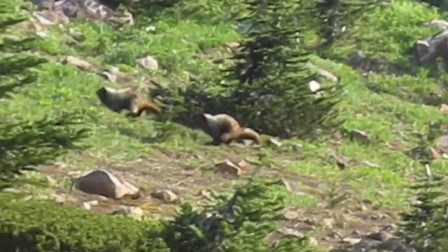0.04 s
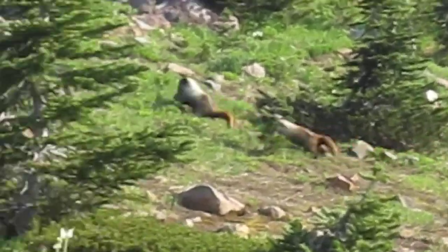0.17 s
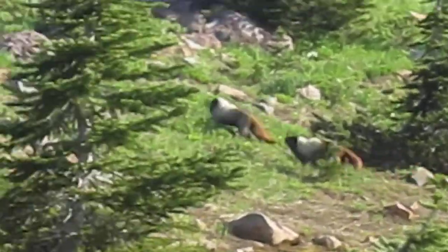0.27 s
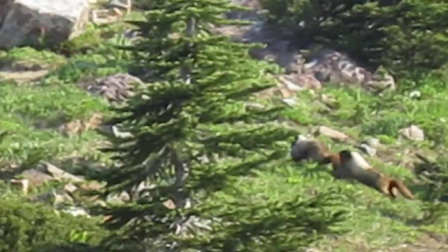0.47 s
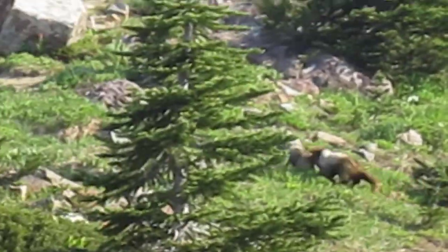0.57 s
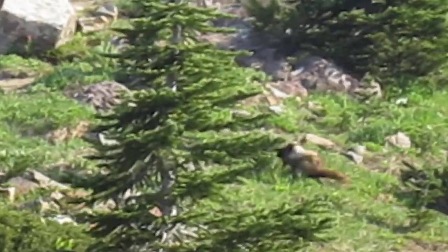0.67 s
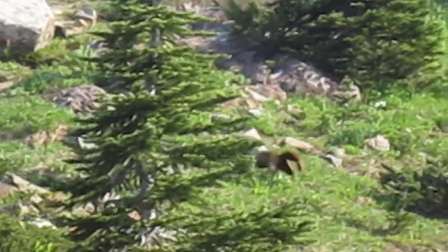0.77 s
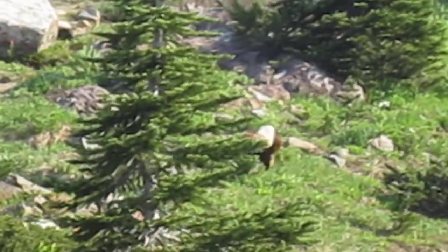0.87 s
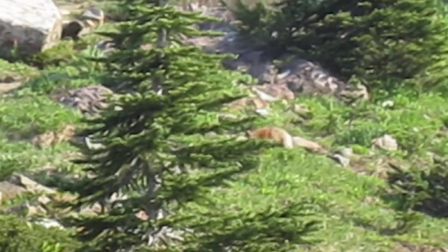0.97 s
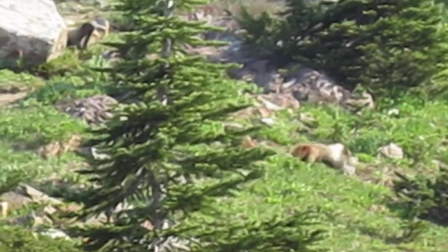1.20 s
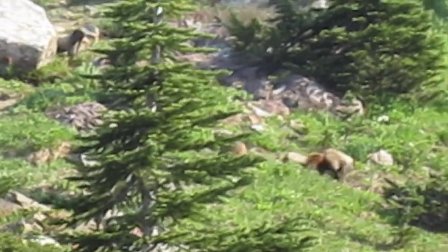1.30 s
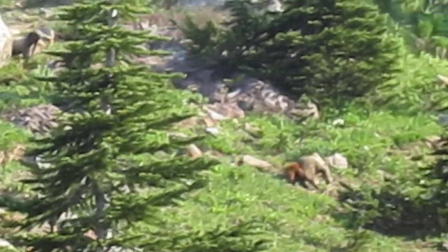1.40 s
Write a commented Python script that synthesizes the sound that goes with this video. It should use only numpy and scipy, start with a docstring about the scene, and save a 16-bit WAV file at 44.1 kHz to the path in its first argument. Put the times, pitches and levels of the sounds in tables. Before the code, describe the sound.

Thin, faint bird whistles in a steady breeze, just after a sharp handling click.

```python
"""An open mountain meadow: light wind, a steady hiss and a faint wavering hum go on throughout.
At 0.2 s a camera is handled close by: its plastic body gives a dull knock, then a sharp click
that makes its gain control turn the sound down a little. A faint tick follows.
From just after the click to the end, a small bird sings thin, arching whistles,
often with two voices at once."""
import sys
import numpy as np
from scipy import signal
from scipy.fft import rfft, irfft, next_fast_len
from scipy.io import wavfile
from scipy.ndimage import uniform_filter1d, map_coordinates

SR = 44100
rng = np.random.default_rng(int(sys.argv[2]) if len(sys.argv) > 2 else 0)


def wav_out(sig):
    """Save sig, one row per channel (or a flat mono array), as 16-bit PCM at SR to the path in sys.argv[1]."""
    wavfile.write(sys.argv[1], SR, np.round(np.clip(np.atleast_2d(sig).T, -1, 1) * 32767).astype(np.int16))


N = 63945  # 1.45 s


def amp(db):
    """Turn decibels into a number to multiply a sound by."""
    return 10 ** (np.asarray(db) / 20)


def unit(x):
    """Scale a sound to an average (rms) size of 1."""
    return x / np.sqrt(np.mean(x ** 2) + 1e-20)


def curves(rows):
    """Join (time, values...) rows with straight lines, giving one curve for each value column."""
    times, *columns = np.transpose(rows)
    return [np.interp(np.arange(N) / SR, times, column) for column in columns]


def wobble(rate):
    """A smooth curve through `rate` random values a second."""
    return map_coordinates(rng.standard_normal(N // 8), [np.arange(N) * rate / SR], mode="mirror")


def filtered(x, response):
    """Multiply each frequency in a sound by response(hz)."""
    size = next_fast_len(N + SR // 2)
    return irfft(rfft(x, size) * response(np.fft.rfftfreq(size, 1 / SR)), size)[:N]


def noise(spectrum):
    """Noise of average size 1, its tone shaped by (frequency [Hz], level [dB]) rows."""
    points_hz, db = np.transpose(spectrum)
    response = lambda hz: amp(np.interp(np.log(hz + 1), np.log(points_hz), db))
    return unit(filtered(rng.standard_normal(N), response))


def lowpass(x, hz, order):
    """Dull a sound by weakening what lies above hz."""
    return signal.lfilter(*signal.butter(order, min(hz, SR / 2 - 1), fs=SR), x)


def wind():
    """The same gusts rumble at the microphone and rush over the grass."""
    # wind strength (time [s], relative level [dB])
    gusts = [(0, 2), (.08, 0.5), (.17, 1), (.33, 0), (.45, 0), (.6, 0), (.8, 0.5), (.91, 4.5), (1.0, 0),
             (1.1, 1), (1.22, -0.5), (1.39, 1), (1.45, -1.5)]
    # tone of the rumble and of the rush (frequency [Hz], relative level [dB])
    rumble_spectrum = [(10, -1), (25, 1.5), (58, 6.5), (85, -1.5), (130, -13), (300, -48)]
    rush_spectrum = [(60, -4.5), (130, 0.5), (280, -1), (450, -3), (650, -4), (900, -6), (1400, -11),
                     (2500, -22), (6000, -37)]
    gust_db, = curves(gusts)
    level_db = -55.5 + gust_db
    rumble = amp(level_db) * noise(rumble_spectrum)
    rush = amp(level_db + .4 * wobble(14.7)) * noise(rush_spectrum)
    return rumble + rush


def hiss():
    """A soft, even hiss whose level barely moves."""
    # loudness of the hiss (time [s], level [dB])
    levels = [(0, -61.5), (.17, -60), (.45, -60.5), (.69, -61), (.755, -59), (.82, -59), (.96, -59.5),
              (1.1, -60.5), (1.24, -60.5), (1.45, -60.5)]
    # tone of the hiss (frequency [Hz], relative level [dB])
    spectrum = [(200, -7), (1500, 1.5), (2500, -.5), (4500, -3), (7000, -6.5), (10000, -10), (13500, -15),
                (15600, -20.5)]
    level_db, = curves(levels)
    return amp(level_db) * noise(spectrum)


def hum():
    """A faint distant tone that wavers in pitch and level."""
    # loudness of the hum (time [s], level [dB])
    levels = [(0, -69.5), (.47, -66), (.55, -62), (.7, -64.5), (.81, -71.5), (.9, -64.5), (1.07, -64),
              (1.25, -69.5), (1.45, -69)]
    level_db, = curves(levels)
    pitch_hz = 561.7 * (1 + .0233 * wobble(70.1))
    phase = 2 * np.pi * np.cumsum(pitch_hz) / SR
    return amp(level_db + 1.7 * wobble(36.7)) * np.sqrt(2) * np.sin(phase)


def whistle(phrase, fade_s=.0054, flutter_share=.004, flutter_db=2.4):
    """One pure, gliding tone that flutters slightly in pitch and level."""
    hz, db = curves(phrase)
    t = np.arange(N) / SR
    start_s, end_s = phrase[0][0], phrase[-1][0]
    fade = np.clip(np.minimum(t - start_s, end_s - t) / fade_s + 1, 0, 1)
    pitch_hz = hz * (1 + flutter_share * wobble(350))
    phase = 2 * np.pi * np.cumsum(pitch_hz) / SR
    return np.sqrt(2) * fade * amp(db + flutter_db * wobble(130)) * np.sin(phase)


def bird(echo_db=-14, echo_s=.15):
    """A bird whistles with two voices; the slope and the fir trees scatter back a weak echo."""
    # lower and upper voice, one list for each whistle (time [s], pitch [Hz], level [dB])
    low_voice = [
        [(.255, 5170, -65), (.264, 5450, -73), (.28, 5120, -69), (.296, 5550, -74)],
        [(.314, 4850, -69), (.338, 5240, -61), (.356, 4800, -70), (.378, 4350, -62), (.388, 4175, -79),
         (.398, 4090, -67), (.43, 4030, -70)],
        [(.782, 4980, -65), (.793, 4920, -85), (.803, 5350, -67), (.818, 5100, -76), (.834, 5300, -67)],
        [(.858, 4780, -76.5), (.869, 5000, -62), (.876, 5400, -76), (.888, 5000, -58), (.896, 4800, -67)],
        [(.903, 3890, -65), (.915, 4560, -56), (.923, 4460, -59), (.933, 4000, -63), (.944, 4030, -59.5),
         (.949, 4770, -56.5), (.956, 5100, -56), (.978, 5000, -56.5), (.993, 4719, -60), (1.01, 4457, -54.5),
         (1.022, 4246, -65.5), (1.035, 3990, -52), (1.045, 3900, -72)],
        [(1.175, 3950, -70), (1.2, 4410, -69), (1.22, 4660, -73), (1.245, 4660, -65), (1.262, 4400, -69),
         (1.272, 3950, -73), (1.302, 3560, -74.5)],
    ]
    high_voice = [
        [(.338, 6450, -77), (.36, 5770, -77), (.386, 5100, -77)],
        [(.886, 5300, -67.5), (.893, 5480, -56), (.903, 5150, -75), (.918, 5560, -64), (.944, 5950, -63),
         (.955, 6500, -64), (.974, 6100, -77), (.992, 6540, -72), (1.008, 6200, -71), (1.035, 5300, -67)],
        [(.995, 5100, -71), (1.015, 4950, -64), (1.035, 4520, -72), (1.06, 4220, -70)],
        [(1.23, 5450, -78), (1.248, 5500, -73), (1.265, 5000, -78)],
        [(1.352, 6900, -78), (1.364, 7080, -68), (1.385, 6600, -85), (1.425, 7000, -76), (1.445, 6660, -74)],
    ]
    song = sum(whistle(phrase) for phrase in low_voice + high_voice)
    t = np.arange(SR // 2) / SR
    tail = rng.standard_normal(len(t)) * amp(-60 * t / echo_s)
    echo = signal.fftconvolve(song, tail / np.linalg.norm(tail))[:N]
    return song + amp(echo_db) * echo


def strike(blows, tones, attack_s, crackle_db, crackle_s, crackle_top_hz, bass_cut_hz):
    """Each blow makes a small body ring and briefly crackle; soft blows sound duller."""
    sound, t = np.zeros(N + SR), np.arange(SR // 8) / SR
    ring = sum(amp(db - 60 * t / ring_s) * np.sin(2 * np.pi * hz * t) * (-1) ** k
               for k, (hz, db, ring_s) in enumerate(tones))
    rise = 1 - np.exp(-t / attack_s)
    for start_s, db, bright_hz in blows:
        crackle = unit(lowpass(rng.standard_normal(len(t)), crackle_top_hz, order=2))
        crackle *= amp(crackle_db - 60 * t / crackle_s)
        hit = lowpass((ring + crackle) * rise, bright_hz, order=1)
        sound[round(start_s * SR):][:len(t)] += amp(db) * hit
    # a small body gives off little bass
    return signal.lfilter(*signal.butter(2, bass_cut_hz, "highpass", fs=SR), sound[:N])


def camera_handling():
    """A dull knock on the plastic body, then a hard click and a faint tick."""
    # blows on the body (time [s], level [dB], dulled above [Hz])
    knocks = [(.2012, -51, 3000), (.2022, -24, 16000), (.2055, -53, 3000)]
    clicks = [(.2238, -10, 20200), (.3025, -36.5, 1500)]
    # tones the body rings with (pitch [Hz], relative level [dB], time to fade by 60 dB [s])
    knock_tones = [(330, -10.5, 0.022), (722, -7.5, 0.054), (1010, -12, 0.039), (1290, -8, 0.028),
                   (1590, -5.5, 0.024), (2000, -7, .013), (2530, -8.5, 0.015), (3310, -4, 0.0077),
                   (4520, -4, 0.01), (4650, -16, .009), (7840, -13, .01), (9390, -18, 0.0067),
                   (11900, -10, 0.0061)]
    click_tones = [(1836, -3.5, 0.0055), (2165, -15, 0.051), (2356, -0.5, 0.007), (2635, -29, 0.062),
                   (3070, -28, 0.0043), (4030, -23, .006), (4210, -21, 0.013), (5410, 3, 0.0044),
                   (6510, -15, .014), (7730, -2.5, 0.0048), (8780, -19.5, 0.015), (10780, 0, 0.0029),
                   (12920, -10, 0.0077), (13500, -29, .035), (14900, -4.5, 0.0038)]
    knock = strike(knocks, knock_tones, attack_s=.0001, bass_cut_hz=205,
                   crackle_db=-5.5, crackle_s=.017, crackle_top_hz=6900)
    click = strike(clicks, click_tones, attack_s=.00008, bass_cut_hz=1670,
                   crackle_db=-13.5, crackle_s=.016, crackle_top_hz=13200)
    return knock + click


def scene():
    """All the sounds added together at one microphone."""
    return (wind() + hiss() + hum() + bird() + camera_handling())[None]


def record(dry):
    """The gain control dips after a loud peak and creeps back; the highest treble is cut off."""
    threshold_db, cut_per_db, attack_s, recover_db_per_s = -29, .2, .019, 3
    top_hz = 16100
    sound = dry[0]
    power = np.abs(uniform_filter1d(sound ** 2, size=88))  # averaged over 2 ms
    level_db = 10 * np.log10(power + 1e-12)
    wanted_cut_db = cut_per_db * np.maximum(level_db - threshold_db, 0)
    # hold on to the deepest cut and let it go slowly
    recovery_db = recover_db_per_s * np.arange(N) / SR
    held_cut_db = np.maximum.accumulate(wanted_cut_db + recovery_db) - recovery_db
    smoothing = np.exp(-1 / (attack_s * SR))
    cut_db = signal.lfilter([1 - smoothing], [1, -smoothing], held_cut_db)
    return filtered(sound * amp(-cut_db), lambda hz: hz < top_hz)[None]


dry = scene()
out = record(dry)
wav_out(out)
```